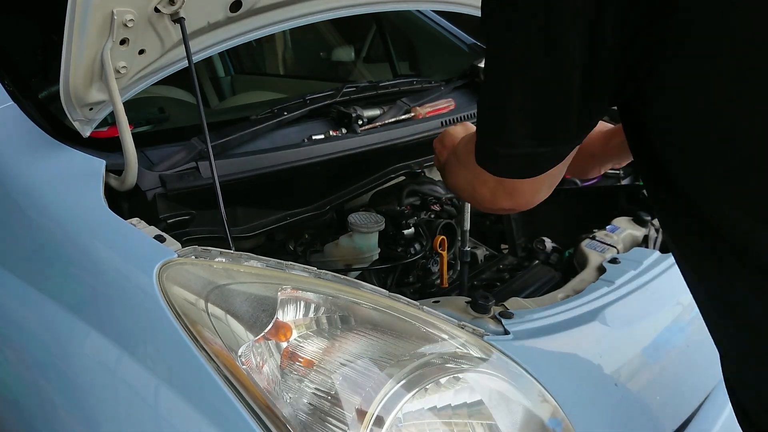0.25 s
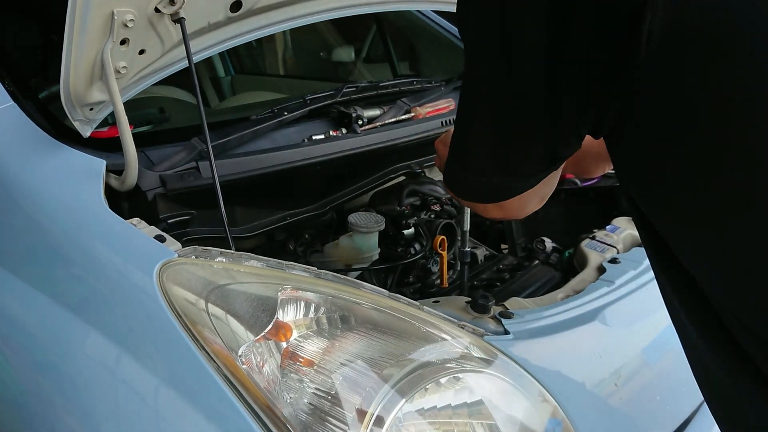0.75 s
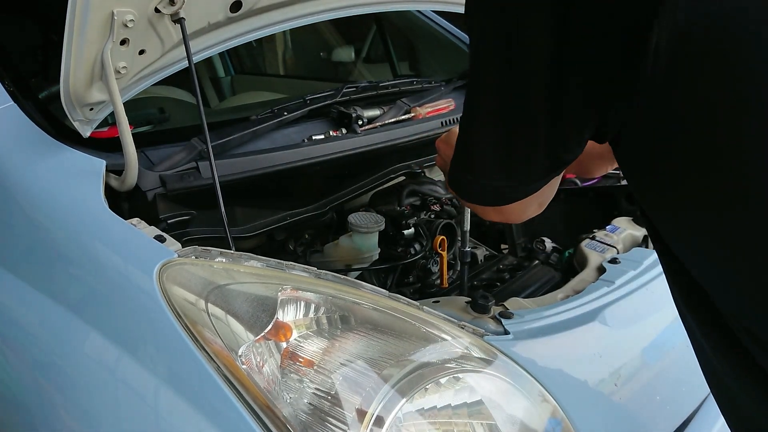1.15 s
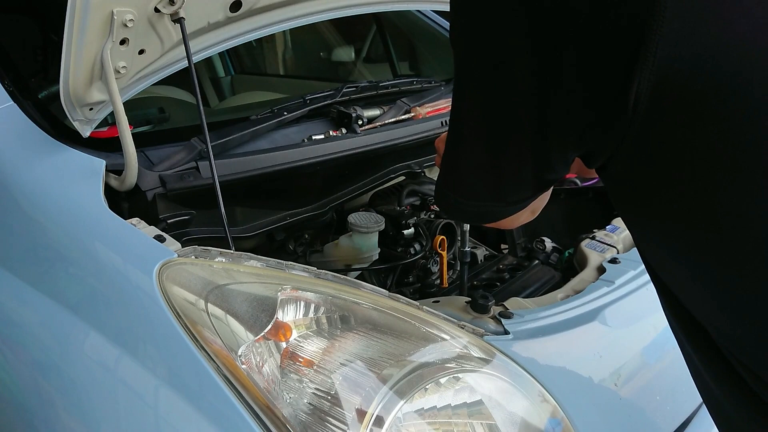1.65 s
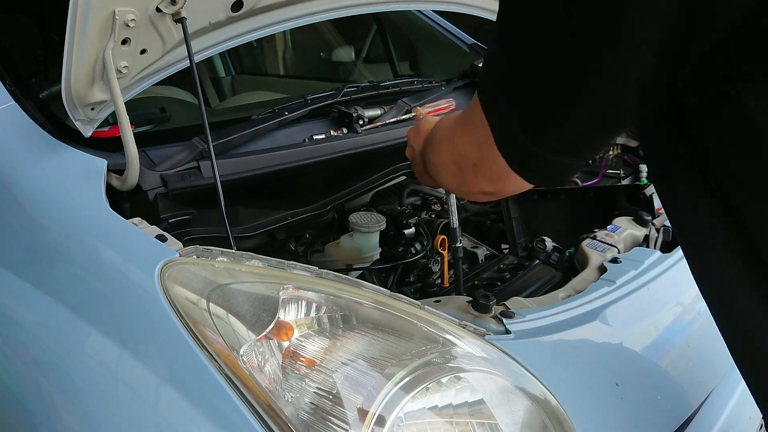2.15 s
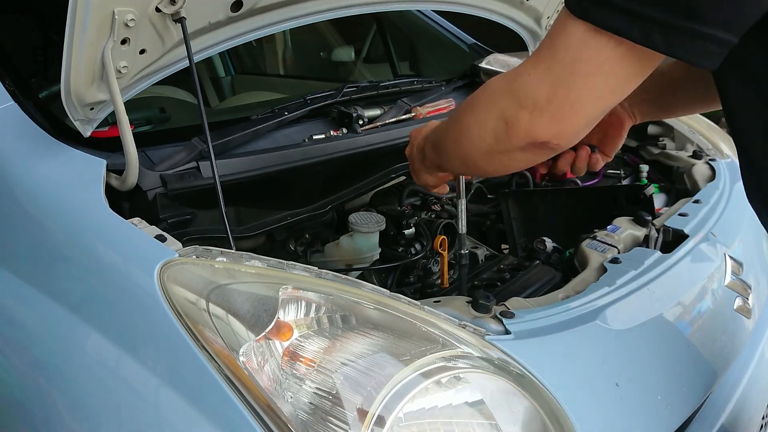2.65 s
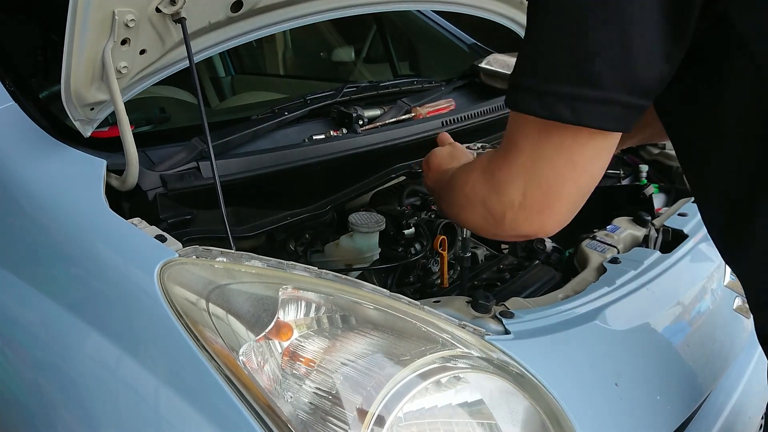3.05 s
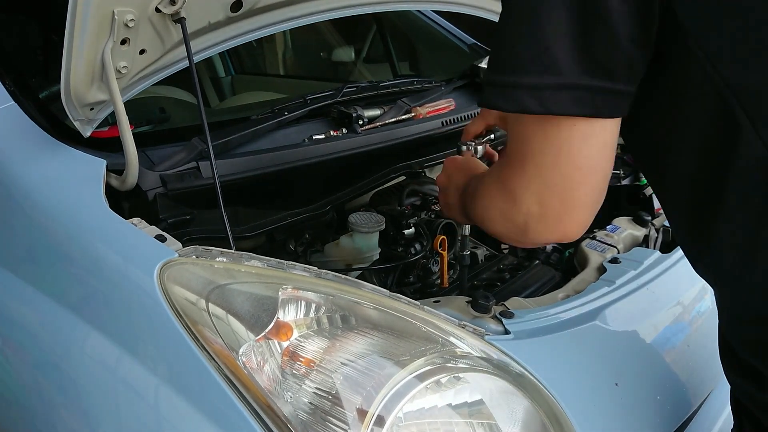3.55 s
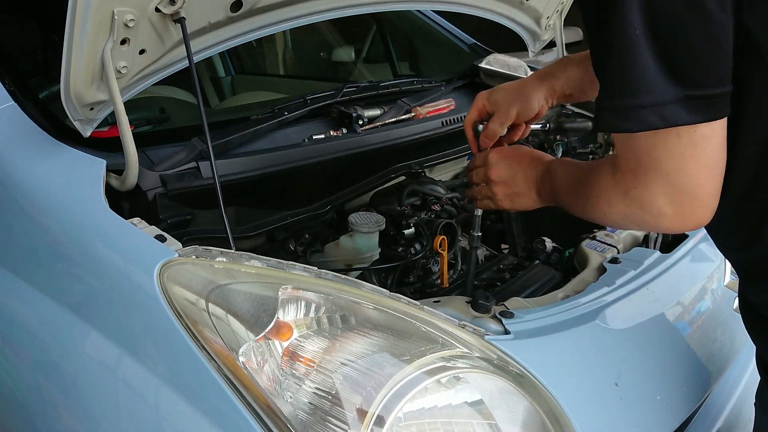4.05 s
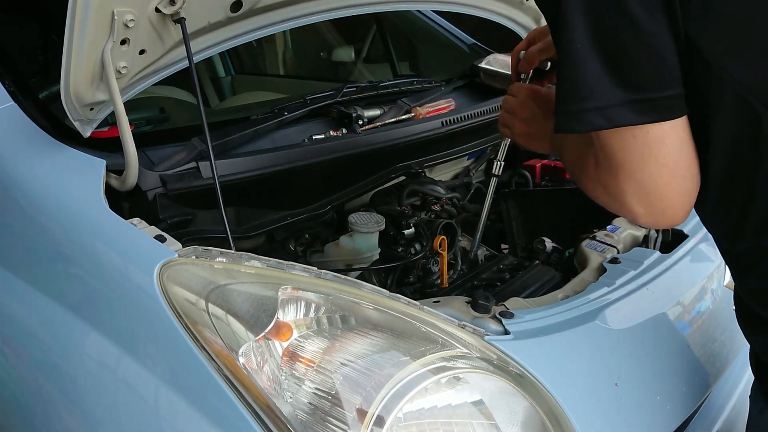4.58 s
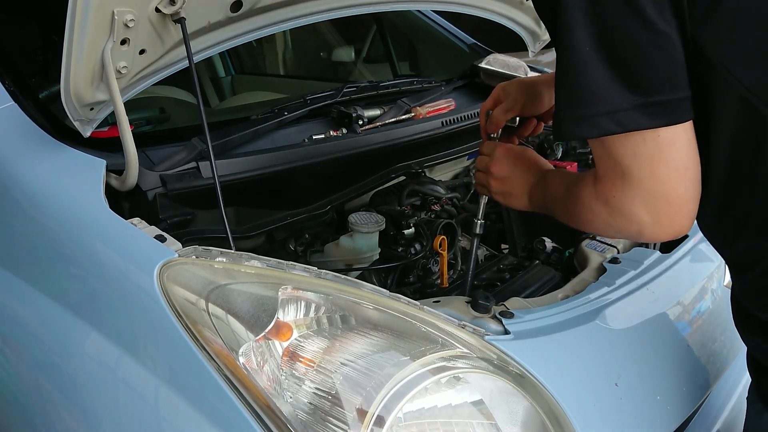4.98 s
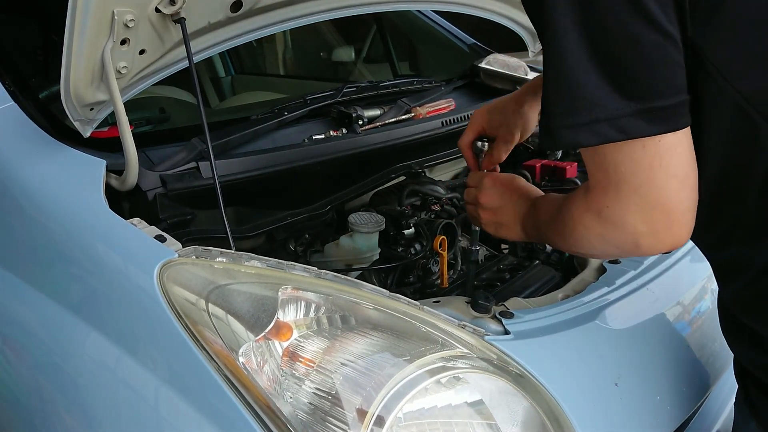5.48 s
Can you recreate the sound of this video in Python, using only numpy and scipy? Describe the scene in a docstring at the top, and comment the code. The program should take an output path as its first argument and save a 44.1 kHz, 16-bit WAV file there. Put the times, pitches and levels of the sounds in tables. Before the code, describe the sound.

Steel sockets and an extension bar clink and knock in an open engine bay outdoors, with wind buffeting and a faint hum.

```python
"""An open engine bay outdoors, a step from the two microphone ports of a small camera.
Steel sockets and an extension bar click, clink and knock: each blow rings panels, bar and socket,
now and then something loose buzzes on, and floor, bonnet and walls echo. Far off a machine hums,
the air rustles, insects hiss in the trees and a bird whistles faintly. Wind buffets the right port."""
import sys
import numpy as np
from scipy import signal
from scipy.fft import rfft, irfft
from scipy.io import wavfile
from scipy.ndimage import uniform_filter1d

SR = 44100
rng = np.random.default_rng(int(sys.argv[2]) if len(sys.argv) > 2 else 0)


def master(y):
    """Save y as 16-bit WAV."""
    cut = np.clip(np.atleast_2d(y).T, -1, 1)
    pcm = np.round(cut * 32767)  # scale
    wavfile.write(sys.argv[1], SR, pcm.astype(np.int16))


N = 252252


def undb(db):
    return 10 ** (np.asarray(db) / 20)


def unit(x):
    return x / np.sqrt(np.mean(x ** 2))


def band(x, low_hz, high_hz):
    return signal.sosfilt(signal.butter(2, [low_hz, high_hz], "band", fs=SR, output="sos"), x + 1e-18)


def curve(rows):
    """Straight lines through (time [s], value) points."""
    return np.interp(np.arange(N) / SR, *np.transpose(rows))


def walk(rate):
    """Random levels held 1 / rate s and smoothed twice; RMS 1."""
    hold = int(SR / rate)
    steps = np.repeat(rng.standard_normal(N // hold + 1), hold)
    return unit(uniform_filter1d(uniform_filter1d(steps, hold), hold)[:N])


def add(out, start_s, x):
    i = int(start_s * SR)
    out[..., i:i + x.shape[-1]] += x[..., :N - i]


def wind():
    """Turbulence on each port on its own; strong gusts reach higher; single eddies thump on the right."""
    # wind on the sheltered left port and on the exposed right port: (time [s], level [dB])
    lee = [(0, -78), (.65, -48.5), (.9, -67), (2.3, -62), (2.43, -33), (2.75, -59.5), (3.7, -50),
           (4.05, -56), (4.4, -45.5), (4.9, -53), (5.18, -42), (5.4, -51)]
    gusts = [(0, -39.5), (.16, -36.5), (.6, -56), (.72, -45.5), (1, -45.5), (1.32, -50.5), (1.78, -39),
             (2.35, -36.5), (2.58, -43.5), (2.99, -61), (3.18, -38), (3.24, -77), (3.94, -44.5),
             (4.75, -55), (5.5, -41.5), (5.72, -60)]
    # eddies hitting the right port: (time [s], level [dB])
    eddies = [(0.009, -28.5), (1.039, -33), (1.101, -36.5), (1.681, -29), (1.709, -32), (1.788, -32.5),
              (2.137, -16.5), (2.229, -25.5), (2.32, -19.5), (2.391, -21.5), (3.958, -28), (5.371, -43)]
    wake_db, wake_s, thump_hz = -6.5, 0.017, 165
    t = np.arange(N) / SR
    gust_db = np.array([curve(lee), curve(gusts)])
    gain = undb(gust_db)
    for s, db in eddies:  # each stirs up a brief swell of turbulence
        gain[1] += undb(db + wake_db) * np.exp(-((t - s - .01) / wake_s) ** 2)
    noise = rng.standard_normal((4, N))
    rumble = unit(band(noise[:2], 45.7, 105.7))
    flutter = unit(band(band(noise[2:], 69, 187), 83, 440))
    flutter_db = 1.86 * (gust_db + 34) - 5.5 + 4 * walk(30)
    out = gain * (rumble + undb(flutter_db) * flutter)
    t = np.arange(int(.04 * SR)) / SR - .0095
    thump = np.sin(2 * np.pi * thump_hz * t + 2.57) * np.exp(-(t * thump_hz / 0.69) ** 2)
    for s, db in eddies:
        add(out[1], s, undb(db) * thump)
    return out


def machine_hum():
    """Steady harmonics of a slow machine far off, louder on the right."""
    # partials of the hum: (multiple of the base pitch, level [dB])
    harmonics = [(2, -58.5), (4, -55.5), (5, -55), (6, -63), (7, -71)]
    base_hz = 31.74
    phase = 2 * np.pi * np.cumsum(base_hz * (1 + 0.0016 * walk(2.06))) / SR
    hum = sum(undb(db + 1.8 * walk(4.024)) * np.sqrt(2) * np.sin(k * phase) for k, db in harmonics)
    return hum * undb([[-4], [3]])


def air():
    """Distant rustle, unrelated at the two ports except in the bass."""
    # spectrum of the rustle: (frequency [Hz], relative density [dB])
    spectrum = [(120, -29), (200, -13.5), (340, -7), (423, -8.5), (588, -12.5), (774, -7), (1520, -17.5),
                (1790, -17.5), (2110, -15), (2360, -17), (3460, -23), (4900, -13), (6810, -13), (8960, -31),
                (15800, -24)]
    hz, db = np.transpose(spectrum)
    bin_hz = np.arange(N // 2 + 1) * SR / N + 1
    shape = undb(np.interp(np.log(bin_hz), np.log(hz), db, left=-200, right=-200))
    noise = rfft(rng.standard_normal((3, N)))
    shared = np.clip(1 - bin_hz / 900, 0, .8)
    ports = np.sqrt(shared) * noise[0] + np.sqrt(1 - shared) * noise[1:]
    return undb(-54) * unit(irfft(shape * ports, N))


def insects():
    """A chorus in the trees: narrow throbbing bands whose pitch wavers and at first sinks."""
    # bands of the chorus: (centre [Hz], width [Hz], relative level [dB])
    voices = [(2230, 110, -7), (4110, 70, -8), (4430, 100, -2), (8860, 350, -11)]
    # swell of the whole chorus: (time [s], level [dB])
    swell = [(0, -69), (.6, -62), (1.9, -62), (2.4, -70), (4, -72), (5.72, -67)]
    sag_per_s, sag_s = .014, 2
    pitch = 1 + 0.0027 * walk(1.7) - sag_per_s * np.minimum(np.arange(N) / SR, sag_s)
    chorus = 0
    for hz, width_hz, db in voices:
        throb_sin, throb_cos = unit(band(rng.standard_normal((2, 2, N)), 3.1, width_hz / 2))
        phase = 2 * np.pi * hz * np.cumsum(pitch) / SR
        chorus += undb(db + walk(9.9)) * (throb_sin * np.sin(phase) + throb_cos * np.cos(phase))
    return chorus * undb(curve(swell))


def ring(modes, t, ring_scale, struck_hz, spread, port_rad, db_per_octave):
    """Each mode is three close neighbours, phased apart at the ports, favoured near struck_hz; peak 1."""
    hz, db, t60 = np.repeat(modes, 3, axis=0).T[:, :, None]
    strength, detune, phase = rng.standard_normal((3, len(hz), 1))
    angle = 2 * np.pi * hz * (1 + spread * detune) * t
    struck_db = db - db_per_octave * np.abs(np.log2(hz / struck_hz)) + 2.17 * strength
    envelope = undb(struck_db - 60 * t / (t60 * ring_scale))
    x = np.array([np.sum(envelope * np.sin(angle + side * port_rad * phase), axis=0) for side in (1, -1)])
    return x / np.abs(x).max()


def tool_blows():
    """A step away, one push rings the panels; a rattle of contacts excites bar and socket and cracks."""
    # blows, rebounds and slides: (time [s], bay [dB], bar [dB], socket [dB], crack [dB],
    # struck panel [Hz], struck bracket [Hz], ring time [factor], rise [ms])
    blows = [(0.129, -21, -40.5, -45, -60, 726, 1690, 0.53, 1.3),
             (0.18, -31.5, -40, -50, -61, 1160, 1900, 0.46, 0.27),
             (1.949, -21, -19.5, -17.5, -19, 720, 3150, 0.87, 0.16),
             (1.963, -22, -31, -26.5, -34, 1190, 3490, 1.24, 6.5),
             (1.998, -21.5, -34, -42, -57, 790, 2540, 0.8, 5),
             (2.245, -39, -42.5, -47, -56, 850, 2090, 0.55, 4.5),
             (2.405, -32, -37, -44.5, -69, 680, 2130, 0.64, 0.84),
             (2.446, -37, -32, -71, -63, 634, 1780, 0.77, 0.45),
             (2.665, -65, -55, -45, -58, 848, 3500, 0.2, 0.88),
             (2.67, -54, -41, -31, -40, 848, 2400, 0.37, 0.24),
             (2.707, -65, -49, -62, -66, 1020, 1580, 0.23, 0.49),
             (2.717, -65, -38, -34.5, -39.5, 820, 3450, 0.45, 0.16),
             (2.772, -58, -49.5, -48, -52, 826, 3600, 0.53, 0.43),
             (2.892, -65, -42.5, -31.5, -40, 1040, 3570, 0.28, 0.13),
             (3.028, -27, -42, -36, -42.5, 650, 2430, 0.57, 0.43),
             (3.21, -34.5, -54, -69, -71, 696, 1500, 1, 3.7),
             (3.954, -37.5, -55, -64, -76, 750, 1740, 0.63, 0.44),
             (4.133, -35, -40, -36.5, -47, 550, 3360, 0.79, 1.3),
             (4.232, -43, -47, -52, -60, 600, 1800, 1.8, 9),
             (4.322, -14, -29.5, -31.5, -35, 850, 2450, 0.6, 0.74),
             (4.3169, -7, -27.5, -28, -29, 964, 1510, 0.87, 0.36),
             (4.333, -13, -37, -38, -45, 1000, 3300, 0.57, 8.9),
             (4.399, -20, -37, -55, -65, 610, 1540, 0.35, 1.8),
             (4.431, -21, -34.5, -47, -58, 970, 1600, 0.28, 0.35),
             (4.437, -33, -30.5, -32, -45, 675, 1760, 1.1, 2.3),
             (5.011, -10.5, -34.5, -48, -62, 1010, 1840, 0.55, 0.6),
             (5.067, -19, -40, -42, -62, 690, 3060, 0.44, 0.94),
             (5.073, -22.5, -44, -51, -64, 620, 3000, 1.08, 2.1),
             (5.337, -45, -35, -42.5, -62, 930, 1830, 0.82, 0.31),
             (5.536, -47, -49, -56.5, -74, 538, 3290, 0.78, 2.4),
             (5.554, -38, -48, -52, -72, 620, 3200, 0.78, 0.87),
             (5.573, -40, -47.5, -58, -73, 604, 2870, 1.1, 0.96),
             (5.602, -48, -40, -39, -60.5, 596, 1880, 0.7, 0.62),
             (5.64, -26, -33, -26.5, -35.5, 890, 1530, 0.58, 2.1)]
    # modes of the struck parts: (frequency [Hz], relative level [dB], t60 at factor 1 [s])
    bay_modes = [(368, 12, 0.048), (556.5, -4, 0.55), (614.4, 10.5, 0.056), (791, 3, 0.13), (997, -3, 0.2),
                 (1088, -11.5, 0.47), (1213, 6.5, 0.073)]  # panels and covers
    bar_modes = [(1510, -6, 0.07), (1800, 5, 0.08), (2500, 8, 0.04), (2900, 11, 0.04), (3400, 13, 0.04)]  # extension bar and brackets
    socket_modes = [(3600, -3, .11), (4780, -1, .08), (5220, -3, .12), (6430, 0, .12), (6860, -1, .24),
                    (7420, -6, .15), (8400, -6, .13), (11900, -8, .12), (13250, -7, .08)]
    rattle_decay_s, push_s = 0.008, .0015
    t = np.arange(int(.22 * SR)) / SR
    out = np.zeros((2, N))
    for s, bay_db, bar_db, socket_db, crack_db, panel_hz, bracket_hz, ring_scale, rise_ms in blows:
        rise_s = rise_ms / 1000
        fade = np.exp(-np.maximum(t - rise_s, 0) / (rattle_decay_s * ring_scale))
        bay = ring(bay_modes, t, ring_scale, panel_hz, spread=.009, port_rad=.45, db_per_octave=19.9)
        panels = undb(bay_db) * bay * np.minimum(t / push_s, 1)
        contacts = rng.standard_normal(len(t)) ** 3 * fade ** 3
        contacts /= np.sqrt(np.sum(contacts ** 2))
        bar = ring(bar_modes, t, ring_scale, bracket_hz, spread=.047, port_rad=.95, db_per_octave=19.4)
        socket = ring(socket_modes, t, ring_scale, 7600, spread=.008, port_rad=2.8, db_per_octave=.87)
        steel = undb(bar_db + 10.5) * bar + undb(socket_db) * socket
        clink = signal.fftconvolve(steel, contacts[None], axes=1)[:, :len(t)]
        # too many modes to tell apart: noise over each part's range, a quick crack and a longer shiver
        noise = rng.standard_normal((3, len(t)))
        noise = noise[0] + 1.335 * noise[1:]
        noise[0] = np.roll(noise[0], rng.integers(-1, 2))  # the spot may lie nearer to one port
        shiver = undb(-60 * t / (0.28 * ring_scale))
        dense = (band(noise * (fade + 0.58 * shiver), 800, 2680) * undb(bar_db + 0.5)
                 + band(noise * (fade + 0.6 * shiver), 5300, 7700) * undb(socket_db + 2)
                 + band(noise * (fade ** 1.6 + 0.18 * shiver), 11030, 14900) * undb(crack_db + 10)
                 + band(noise * (fade + 0.81 * shiver), 498, 1340) * undb(bay_db - 9.5))
        engine_jolt = band(noise * fade ** 2, 156, 760) * undb(crack_db + 7.5)
        attack = np.minimum(t / rise_s, 1) ** 2
        add(out, s, (panels + clink + dense + engine_jolt) * attack)
    return out * undb([[-.6], [.6]])


def yard_echo(x):
    """Diffuse echoes of floor, bonnet and walls, starting after the first wall."""
    # bands of the echo: (low edge [Hz], high edge [Hz], t60 [s], level [dB])
    echo_bands = [(217, 1410, 0.56, -19), (1520, 4700, 0.53, -17.5), (4970, 12800, 0.51, -20)]
    wall_delay_s = .016
    t = np.arange(int(.6 * SR)) / SR
    tail = 0
    for low_hz, high_hz, t60, db in echo_bands:
        decay = unit(band(rng.standard_normal((2, len(t))), low_hz, high_hz)) * undb(-60 * t / t60)
        tail += undb(db) * band(decay, low_hz, high_hz) / np.sqrt(np.sum(decay ** 2) / 2)
    tail = np.pad(tail * np.minimum(t / 0.00062, 1), ((0, 0), (int(wall_delay_s * SR), 0)))
    return signal.fftconvolve(x, tail, axes=1)[:, :N]


def bird():
    """Far, near-pure notes that slide quickly at first and then settle; their level flickers."""
    # whistles: (time [s], length [s], start pitch [Hz], end pitch [Hz], level [dB])
    notes = [(.4, 0.24, 1165, 1150, -70), (0.682, 0.08, 1030, 982, -66), (0.794, 0.055, 1030, 990, -66),
             (0.918, 0.08, 1040, 984, -66.5), (1.03, 0.065, 1077, 980, -65),
             (1.164, 0.034, 2170, 3230, -65), (1.199, 0.0257, 2200, 1350, -61),
             (1.277, 0.023, 2230, 1426, -60), (1.292, 0.086, 1394, 1423, -65),
             (1.437, 0.1, 1440, 1410, -71)]
    out = np.zeros(N)
    for s, length_s, start_hz, end_hz, db in notes:
        progress = np.linspace(0, 1, int(length_s * SR))
        hz = end_hz + (start_hz - end_hz) * (1 - progress) ** 2.3
        tone = np.sqrt(2) * np.sin(2 * np.pi * np.cumsum(hz) / SR)
        add(out, s, undb(db) * tone * signal.windows.tukey(len(tone), .4))
    return out * undb(2.5 * walk(60)) * np.ones((2, 1))


def loose_buzzes():
    """Something loose buzzes on after a blow: narrow trembling tones that fade away."""
    # buzzes in the bay: (time [s], length [s], pitch [Hz], level [dB])
    buzzes = [(2.481, 0.11, 1630, -51), (2.511, 0.085, 736, -52), (3.048, 0.033, 578, -49),
              (4.357, 0.036, 6510, -41.5), (5.552, 0.057, 588, -45.5)]
    out = np.zeros(N)
    for s, length_s, hz, db in buzzes:
        n = int(length_s * SR)
        tremble = unit(band(rng.standard_normal(n), hz - 55, hz + 55))
        add(out, s, undb(db) * tremble * signal.windows.tukey(n, .4) * np.linspace(1, .2, n))
    return out


def scene():
    """Tools close by, the far sounds a little to the right, wind on the ports themselves."""
    work = tool_blows() + loose_buzzes()
    song = bird()
    far = air() + insects() + song + 2.1 * yard_echo(song)
    return work + yard_echo(work) + far * undb([[-1.25], [1.25]]) + wind() + machine_hum()


def record(dry):
    """The left port is duller; the camera rounds the loudest peaks and cuts deep bass and the top."""
    left = signal.sosfilt(signal.butter(1, 12000, fs=SR, output="sos"), dry[0])
    bass_cut = signal.sosfilt(signal.butter(6, 44, "high", fs=SR, output="sos"), [left, dry[1]])
    return signal.sosfilt(signal.ellip(10, .2, 80, 16600, fs=SR, output="sos"), np.tanh(bass_cut))


dry = scene()
out = record(dry)
master(out)
```